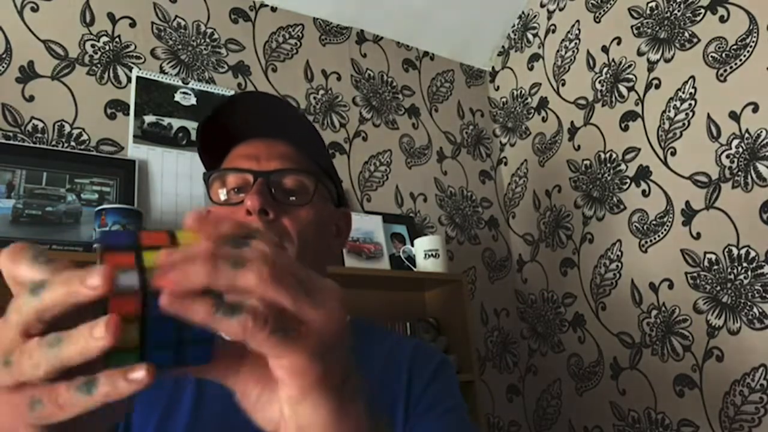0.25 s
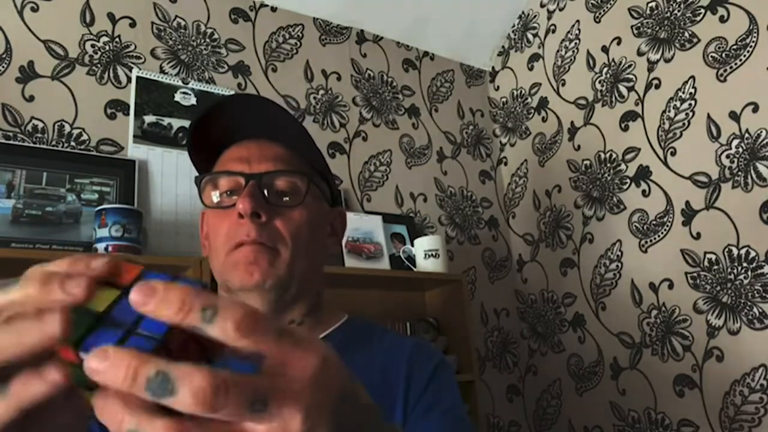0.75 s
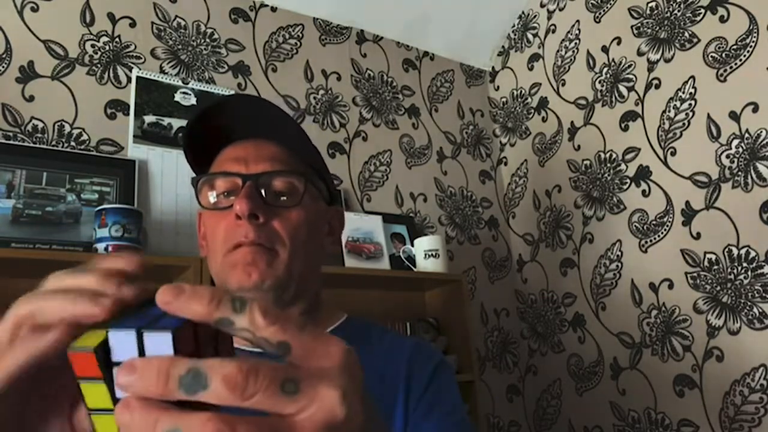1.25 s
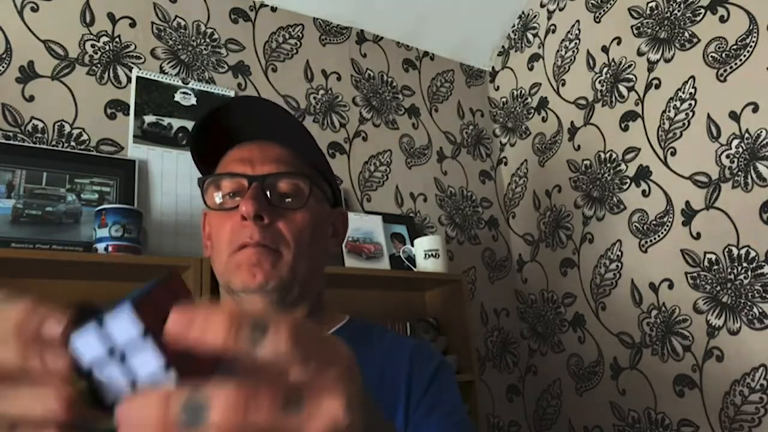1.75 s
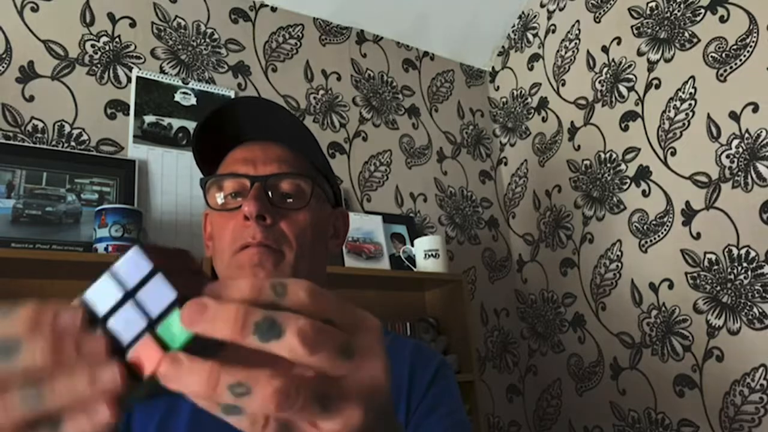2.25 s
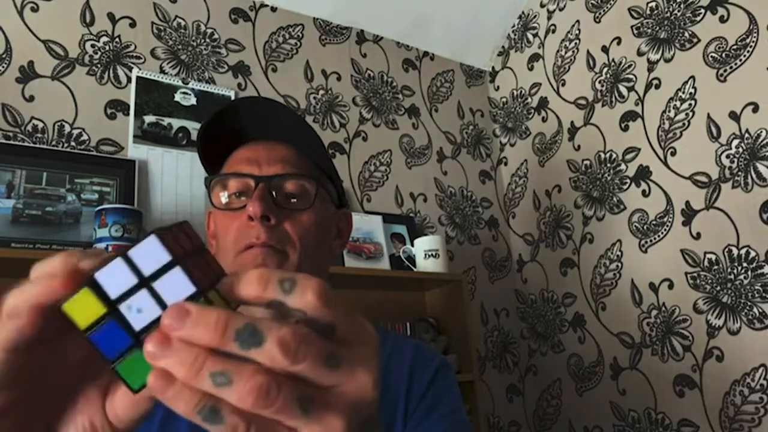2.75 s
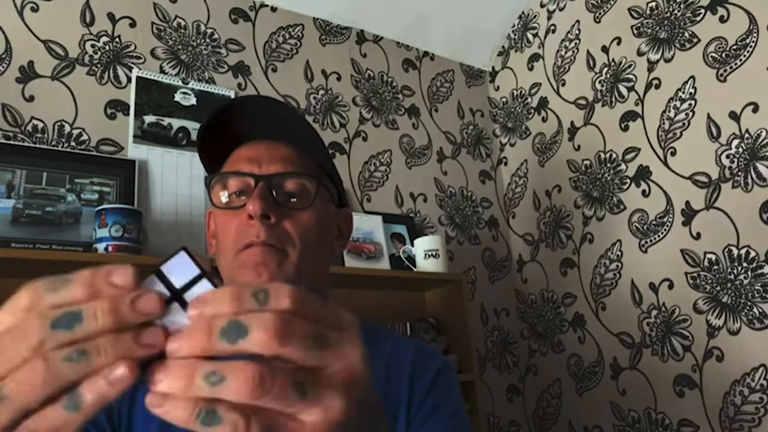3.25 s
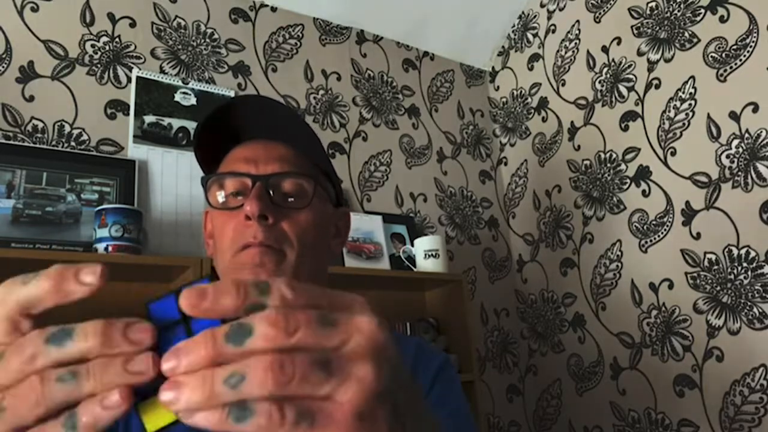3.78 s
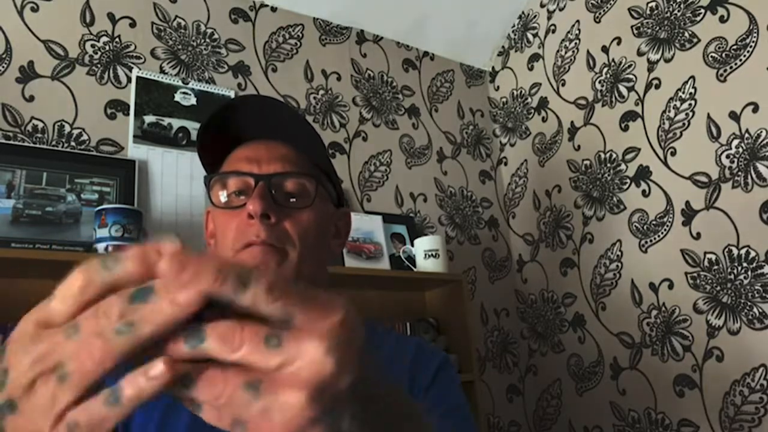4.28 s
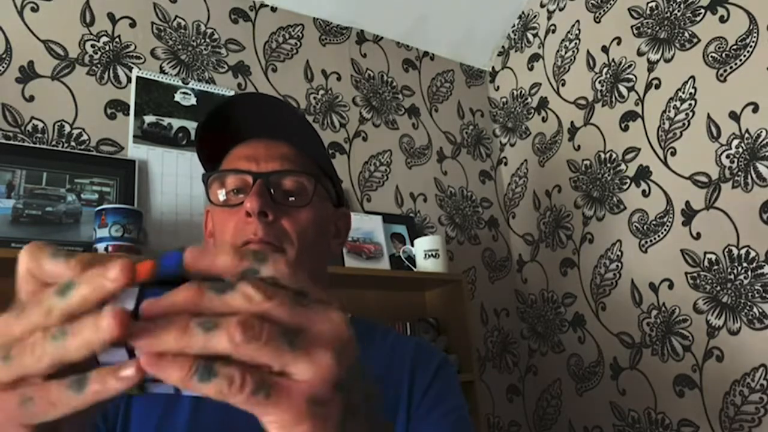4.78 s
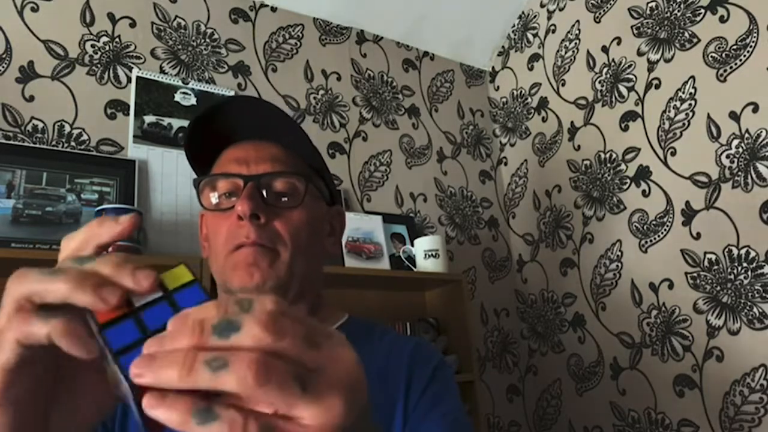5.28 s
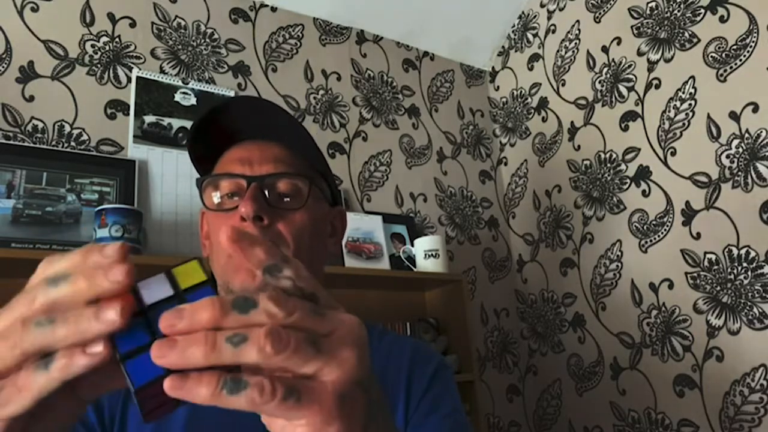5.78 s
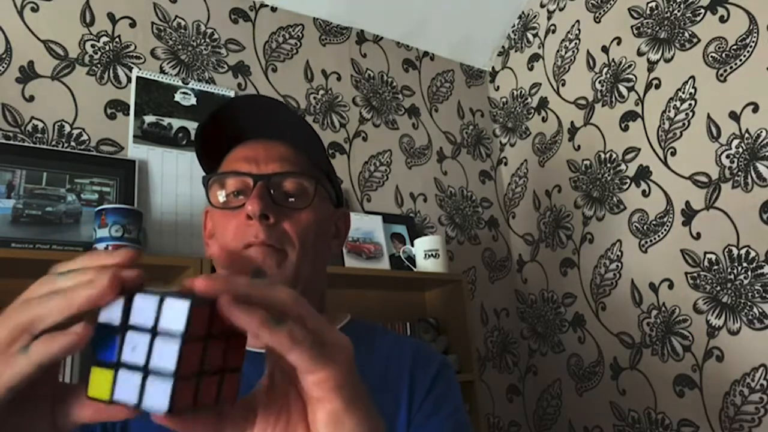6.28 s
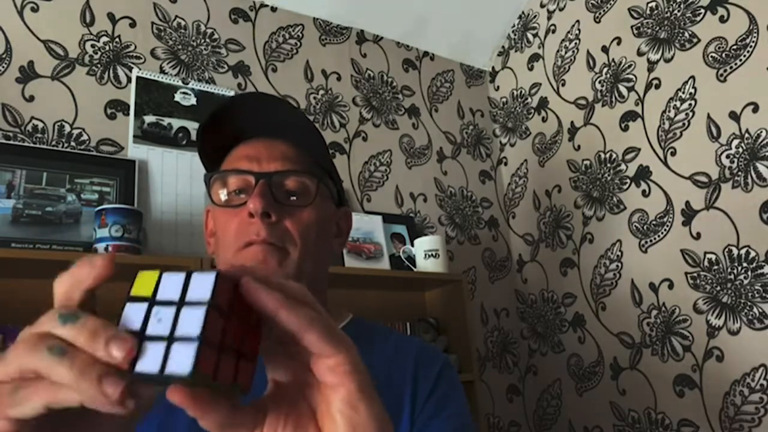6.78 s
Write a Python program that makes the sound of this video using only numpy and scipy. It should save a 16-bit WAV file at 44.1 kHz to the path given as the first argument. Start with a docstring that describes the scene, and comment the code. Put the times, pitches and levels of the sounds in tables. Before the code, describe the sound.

Hands twist a hollow plastic puzzle cube close to a stereo microphone in a small furnished room. Sharp clacks come in rapid irregular clusters, with dull little ticks and a faint dry hiss as layers slide. A bright hard snap stands out just after two seconds, and another dense burst comes near three. Later the clicks grow sparser and softer, with a few dull low thumps, over a faint steady room noise.

```python
"""A plastic puzzle cube is twisted quickly by hand, close to a pair of microphones in a small furnished room.
From the start, over faint steady noise, hollow pieces crack and clack as layers catch and land: ringing modes
plus noise bursts. Between knocks the sliding layers tick (streams of dull contacts) and hiss (shaped noise).
A few dull low thumps, a sine in a bed of rumble, come mostly late on, as the clacks grow sparser.
Decaying noise adds reflections and a short room tail throughout."""
import sys
import numpy as np
from scipy import signal
from scipy.fft import rfft, irfft, next_fast_len
from scipy.io import wavfile
from scipy.ndimage import uniform_filter1d

SR = 44100
rng = np.random.default_rng(int(sys.argv[2]) if len(sys.argv) > 2 else 0)


def wav_record(signal):
    """Record a signal, one row per channel, as 16-bit PCM in the file named by sys.argv[1]."""
    frames = np.transpose(np.atleast_2d(signal))
    bounded = np.clip(frames, -1, 1)
    # unit amplitude maps onto the largest positive 16-bit level
    quanta = np.round(bounded * 32767).astype(np.int16)
    wavfile.write(sys.argv[1], SR, quanta)


N = 310023

# plastic faces rubbing or slipping free, relative spectrum: freq_hz, density_db_per_hz
RUB_SPECTRUM = [(500, -2.5), (1300, -1), (5500, 7), (7800, 2.5), (13500, -2.5), (15700, -15)]


def from_db(db):
    """Decibels to gain."""
    return 10 ** (np.asarray(db) / 20)


def rms_one(x):
    """Scale to an rms of 1."""
    return x / np.sqrt(np.mean(x ** 2) + 1e-20)


def at_hz(points, hz):
    """Read a table on a log-frequency axis."""
    freqs_hz, values = np.transpose(points)
    return np.interp(np.log(np.maximum(hz, 1)), np.log(freqs_hz), values)


def add(out, start_s, sound):
    """Mix a sound into the stereo buffer at start_s."""
    at = int(np.clip(round(start_s * SR), 0, N))
    out[:, at:at + sound.shape[1]] += sound[:, :N - at]


def swell_and_fade(age):
    """An envelope that peaks at age 1 and then dies away."""
    return age * np.exp(1 - age)


def coloured_noise(spectrum, size):
    """Coloured noise from one direction: the same at both microphones, rms 1."""
    hz = np.arange(size // 2 + 1) * SR / size
    white = rfft(rng.standard_normal((1, size)))
    return rms_one(irfft(white * from_db(at_hz(spectrum, hz)), size))


def diffuse_noise(spectrum, size, mic_gap_s=0.00013, most_alike=0.29):
    """Coloured noise from all sides, rms 1: partly alike at both mics in the bass, unrelated in the treble."""
    hz = np.arange(size // 2 + 1) * SR / size
    alike = most_alike * np.sinc(2 * hz * mic_gap_s)
    mid, side = rfft(rng.standard_normal((2, size)))
    pair = np.sqrt(1 + alike) * mid + np.sqrt(1 - alike) * side * np.array([[1], [-1]])
    return rms_one(irfft(pair * from_db(at_hz(spectrum, hz)), size))


def room_noise(level_db=-71.5):
    """Steady diffuse noise, strongest in the bass."""
    # relative spectrum: freq_hz, density_db_per_hz
    floor_spectrum = [(25, -16), (52, 3), (100, -10), (250, -12.5), (600, -21.5), (1300, -25.5),
                      (3000, -32.5), (13500, -42.5)]
    return from_db(level_db) * diffuse_noise(floor_spectrum, 2 * next_fast_len(N // 2 + 1))[:, :N]


def room(x, early_db=-15.5, early_t60_s=0.15, late_db=-6.0, late_t60_s=0.15, onset_s=0.00052,
         size=16384, poses=32):
    """Hands and chest reflect at once, then the room's short tail dies away; both shift as the cube moves."""
    # relative echo spectrum: freq_hz, level_db
    echo_colour = [(650, 5.5), (900, -3), (1220, 1), (1950, 2.5), (3000, 3), (13500, 2)]
    t = np.arange(size) / SR
    onset = 1 - np.exp(-(t / onset_s) ** 2)
    out = np.zeros((2, N))
    for pose in np.array_split(np.arange(N), poses):
        # quick reflections come from the cube's own direction, the tail from all sides
        early = rms_one(coloured_noise(echo_colour, size) * from_db(-60 * t / early_t60_s) * onset)
        late = rms_one(diffuse_noise(echo_colour, size) * from_db(-60 * t / late_t60_s) * onset)
        reflections = signal.fftconvolve(x[:, pose], early, axes=1)
        tail = signal.fftconvolve(x[:1, pose], late, axes=1)
        add(out, pose[0] / SR, from_db(early_db) * reflections)
        add(out, pose[0] / SR, from_db(late_db) * tail)
    return out / np.sqrt(size)


def thumps(ring_db=-3, rumble_db=-3, low_hz=42, reach=1.18, side_db=-16, size=32768):
    """Each thump swells and fades around one low pitch, in a bed of rumble."""
    # dull low thumps: start_s, level_db, pitch_hz, swell_s
    thump_events = [(1.211, -64, 53.2, 0.036), (4.126, -56, 50, 0.052), (5.118, -51, 48, 0.057),
                    (5.678, -48, 216.3, 0.014), (5.735, -53, 169, 0.031), (6.669, -38, 134.6, 0.027)]
    out, t = np.zeros((2, N)), np.arange(size) / SR
    for start_s, level_db, pitch_hz, swell_s in thump_events:
        edges_hz = [low_hz, max(reach * pitch_hz, low_hz + 10)]
        band = signal.butter(2, edges_hz, "band", fs=SR, output="sos")
        # the first half is the filter settling
        mid, side = rms_one(signal.sosfilt(band, rng.standard_normal((2, 2 * size)))[:, size:])
        rumble = mid + from_db(side_db) * side * np.array([[1], [-1]])
        ring = rms_one(np.sin(2 * np.pi * pitch_hz * t))
        body = from_db(ring_db) * ring + from_db(rumble_db) * rumble
        add(out, start_s, from_db(level_db) * body * swell_and_fade(t / swell_s))
    return out


def friction(times_s, idle_db=-89):
    """How hard the layers rub at these times, in dB; between turns the fingers only shift their grip."""
    # layers sliding over each other: start_s, end_s, friction_db
    turns = [(0, 0.014, -51.5), (0.092, 0.22, -62), (0.241, 0.457, -73.5), (0.512, 0.62, -66.5),
             (0.769, 0.885, -72), (1.069, 1.162, -60.5), (1.193, 1.582, -77), (1.663, 1.972, -64.5),
             (2.025, 2.286, -76.5), (2.519, 2.678, -66.5), (2.729, 2.909, -71.5), (2.916, 3, -56.5),
             (3.341, 3.624, -76.5), (3.619, 3.683, -60), (4.062, 4.205, -71.5), (4.382, 4.786, -67),
             (4.822, 4.923, -62), (4.981, 5.147, -70.5), (5.49, 5.606, -70), (6.538, 6.711, -63)]
    friction_db = np.full(len(times_s), float(idle_db))
    for start_s, end_s, turn_db in turns:
        friction_db[(times_s > start_s) & (times_s < end_s)] = turn_db
    return friction_db


def swish(level_db=-5.0, ease_s=0.018):
    """The faces of the layers hiss softly against each other, easing in and out of every turn."""
    speed = uniform_filter1d(from_db(friction(np.arange(N) / SR)), int(ease_s * SR))
    hiss = coloured_noise(RUB_SPECTRUM, 2 * next_fast_len(N // 2 + 1))[:, :N]
    return from_db(level_db) * speed * hiss


def contact(treble_db, rise_cycles=0.34, split_hz=2500, cushion_db=-14, cushion_hz=4000,
            ear_db=1, shade_db=1.33, detune=0.07, uneven_db=4, size=1100):
    """One plastic knock as ringing modes, rms 1 over its first 3 ms; every piece and spot rings differently."""
    # modes of a hollow piece, nominal: pitch_hz, level_db, t60_s
    modes = [(335, -22.5, 0.01), (678, -17.5, 0.022), (1182, -9.5, 0.029), (1336, -9.5, 0.018),
             (1602, -11, 0.015), (2453, 2.5, 0.0062), (2755, 1, 0.0065), (3370, -1.5, 0.01),
             (4010, -3, 0.0057), (5400, 2, 0.0054), (6450, -1, 0.0036), (7830, -4.5, 0.004),
             (9630, -4, 0.0022), (13400, -13.5, 0.0033)]
    hz, level_db, t60_s = np.transpose(modes)[:, :, None]
    pitch, strength, phase, pan = rng.standard_normal((4, len(hz), 1))
    sides, t = np.array([-1, 1])[:, None, None], np.arange(size) / SR
    height = np.tanh(2 * np.log(hz / split_hz))   # toward -1 for body modes, +1 for treble modes

    # modes far from the split keep their pitch best; wall modes near it vary most
    hz = hz * np.exp(detune * pitch * (2 - height ** 2))
    level_db = level_db + uneven_db * strength

    # a harder, shorter contact feeds the high modes more
    energy = from_db(2 * level_db) * t60_s
    treble_energy = np.sum(energy * np.maximum(height, 0))
    body_energy = np.sum(energy * np.maximum(-height, 0))
    balance_db = 10 * np.log10(treble_energy / body_energy)
    tilt_db = (treble_db - balance_db) * height / 2
    # a knock cushioned by the fingers loses its very top as well
    tilt_db = tilt_db + min(treble_db - cushion_db, 0) * np.maximum(np.log(hz / cushion_hz), 0)

    # each mode radiates its own way, and the hands shade the treble on the left
    side_db = (ear_db * pan + shade_db * height) * sides
    # low modes take longer to swell, so the tick leads the knock
    swell = 1 - np.exp(-(t * hz / rise_cycles) ** 2)
    gain = from_db(level_db + tilt_db + side_db - 60 * t / t60_s)
    sound = (gain * swell * np.sin(2 * np.pi * (hz * t + phase))).sum(axis=1)
    return sound / np.sqrt(np.mean(sound[:, :SR // 333] ** 2))


def sliding(level_db=-1, spread_db=6, treble_db=-21, treble_spread_db=5, light_db=-68,
            most_slips_per_s=480, candidates=5000, pieces=60):
    """Edges catch and slip as a layer turns: a stream of dull, uneven ticks from many pieces."""
    out = np.zeros((2, N))
    ticks = [contact(treble_db + treble_spread_db * luck) for luck in rng.standard_normal(pieces)]
    times_s, chance = rng.random((2, candidates))
    times_s = times_s * N / SR
    friction_db = friction(times_s)
    uneven = np.minimum(rng.exponential(1, candidates) - 1, np.sqrt(3))
    ticks_db = friction_db + level_db + spread_db * uneven
    # under a light touch the same energy comes as fewer, separate ticks
    busy = np.minimum(from_db(2 * (friction_db - light_db)), 1)
    kept = chance < busy * most_slips_per_s * N / SR / candidates
    for k in np.flatnonzero(kept):
        add(out, times_s[k], from_db(ticks_db[k]) / np.sqrt(busy[k]) * ticks[k % pieces])
    return out


def crack(fade_s=0.0006, size=384):
    """The dry, noisy split second in which an edge slips free."""
    return coloured_noise(RUB_SPECTRUM, size) * swell_and_fade(np.arange(size) / SR / fade_s)


def knocks(start_s, level_db, treble_db, gap_s, step_db, count):
    """A run of unevenly spaced knocks, weaker with distance from start_s; a negative gap places them before."""
    delays_s = np.cumsum(gap_s * (.5 + rng.random(count)))
    return [(start_s + delay_s, from_db(level_db + step_db * k) * contact(treble_db))
            for k, delay_s in enumerate(delays_s)]


def clacks(trim_db=-10, hardness_db=10, catch_s=.0012, crack_db=0, crack_follows=0.85,
           run_up_db=-17, run_up_s=0.0016, step_db=-1.5, rebound_db=-8, rebound_s=.0018,
           rattle_db=-15, rattle_s=.008, loosening=0.21, firm_db=-66):
    """An edge scuffs ever harder, cracks free, lands and rebounds; harder rubbing makes neighbours rattle more."""
    # a layer catches or lands, before the offsets above: start_s, level_db, treble_db (relative to level)
    clack_events = [(0.032, -38, -25), (0.066, -29, -13.5), (0.106, -21.5, -21), (0.109, -20, -11),
                    (0.118, -26, -11), (0.137, -21.5, -26), (0.179, -28, -5), (0.264, -29.5, -28.5),
                    (0.278, -28.5, -27), (0.318, -34, -17), (0.347, -28, -21), (0.378, -23, -18),
                    (0.413, -28.5, -20.5), (0.532, -32.5, -23), (0.577, -24, -12.5), (0.638, -41, -43),
                    (0.657, -32.5, -17.5), (0.821, -44, -28), (0.829, -36, -31), (0.843, -31.5, -6),
                    (0.871, -41.5, -15), (0.887, -36.5, -17.5), (0.997, -27, -6), (1.007, -30.5, -19),
                    (1.072, -36.5, -28), (1.092, -26.5, -21), (1.108, -22.5, -11.5), (1.119, -25, -26),
                    (1.13, -41, -13), (1.228, -41, -27), (1.286, -35.5, -18.5), (1.361, -40, -20.5),
                    (1.491, -37, -23.5), (1.515, -36.5, -18), (1.699, -28, -23), (1.712, -28.5, -11),
                    (1.721, -27, -32), (1.816, -33, -18.5), (1.845, -28, -18), (1.869, -24.5, -25),
                    (1.88, -30.5, -15), (2.002, -41, -20), (2.04, -37.5, -29), (2.093, -29, -25.5),
                    (2.123, -33.5, -26), (2.146, -35, -20), (2.23, -35, -31), (2.241, -36, -15),
                    (2.27, -32, -30), (2.28, -26, -19.5), (2.3487, -16.5, -8.5), (2.353, -20, -11.5),
                    (2.456, -26, -14), (2.511, -45, -12), (2.576, -42, -10), (2.595, -30.5, -15.5),
                    (2.745, -37.5, -28), (2.766, -33.5, -20.5), (2.774, -34, -3), (2.807, -32, -22),
                    (2.845, -24.5, -11.5), (2.857, -27, -18), (2.879, -36.5, -21), (2.888, -27, -12),
                    (2.923, -21.5, -11), (2.931, -19, -19.5), (2.967, -22, -23), (2.975, -30.5, -9.5),
                    (3.184, -41, -13), (3.364, -41.5, -31.5), (3.421, -49, -48), (3.487, -31.5, -27.5),
                    (3.577, -38.5, -29.5), (3.654, -23, -22), (3.667, -22.5, -14.5), (3.718, -33.5, -21.5),
                    (3.862, -49.5, -27), (3.891, -45, -13), (3.913, -41.5, -17), (4.021, -30.5, -37.5),
                    (4.073, -47, -45), (4.127, -34, -31.5), (4.152, -31, -41), (4.167, -37, -23),
                    (4.308, -41, -44), (4.378, -25.5, -20), (4.396, -26.5, -10), (4.42, -33.5, -13.5),
                    (4.518, -39, -19), (4.561, -35, -23), (4.573, -28, -27), (4.59, -28, -17.5),
                    (4.641, -36, -23), (4.676, -29.5, -15.5), (4.707, -22.5, -24), (4.745, -32.5, -23),
                    (4.834, -39, -20), (4.844, -31, -23.5), (4.851, -37.5, -14), (4.899, -34.5, -35),
                    (4.99, -40.5, -17), (5.027, -33, -21.5), (5.101, -36, -42), (5.129, -40.5, -18),
                    (5.266, -48.5, -27), (5.33, -36, -14), (5.433, -40.5, -22), (5.494, -40.5, -32.5),
                    (5.527, -25.5, -11), (5.629, -45.5, -31), (5.684, -52, -33), (5.746, -53.5, -24),
                    (5.982, -53, -44), (6.007, -46, -36), (6.028, -44.5, -19), (6.245, -53, -42),
                    (6.43, -36.5, 0.5), (6.545, -37.5, -24), (6.587, -28, -30), (6.62, -29.5, -26.5),
                    (6.638, -42, 2), (6.928, -51, -31), (6.976, -25, -19)]
    out = np.zeros((2, N))
    for start_s, level_db, treble_db in clack_events:
        start_s = start_s + catch_s
        level_db = level_db + trim_db
        treble_db = treble_db + hardness_db
        loose_db = level_db + loosening * (friction(np.array([start_s]))[0] - firm_db)
        add(out, start_s, from_db(level_db) * contact(treble_db))
        # duller knocks crack less
        add(out, start_s, from_db(level_db + crack_db + crack_follows * min(treble_db, 0)) * crack())
        run_up = knocks(start_s, loose_db + run_up_db, treble_db, -run_up_s, step_db, count=4)
        rebound = knocks(start_s, loose_db + rebound_db, treble_db, rebound_s, step_db, count=2)
        rattle = knocks(start_s, loose_db + rattle_db, treble_db, rattle_s, step_db, count=3)
        for at_s, sound in run_up + rebound + rattle:
            add(out, at_s, sound)
    return out


def scene(low_edge_hz=480):
    """The cube, too small to radiate bass, is turned in the room."""
    high_pass = signal.butter(2, low_edge_hz, "high", fs=SR, output="sos")
    cube = signal.sosfilt(high_pass, clacks() + sliding() + swish())
    return room_noise() + room(cube) + thumps() + cube


def record(dry, cutoff_hz=17000):
    """The left leads ever more toward the treble, swinging the pair in and out of phase; the top is cut steeply."""
    # left channel's lead over the right: freq_hz, lead_rad
    lead_points = [(0, 0), (4400, 1), (6300, 4.35), (15700, 15.7)]
    size, sides = 2 * next_fast_len(N), np.array([[1], [-1]])
    left, right = rfft(dry, size)
    lead_rad = np.interp(np.arange(size // 2 + 1) * SR / size, *np.transpose(lead_points))
    # high up, wherever the channels are exactly in or out of phase, both carry the same sound
    apart = np.abs(np.sin(np.maximum(lead_rad, 3 * np.pi / 2)))
    narrowed = ((left + right) + (left - right) * apart * sides) / 2
    pair = irfft(narrowed * np.exp(.5j * lead_rad * sides), size)[:, :N]
    return signal.sosfilt(signal.cheby2(14, 70, cutoff_hz, fs=SR, output="sos"), pair)


dry = scene()
out = record(dry)
wav_record(out)
```